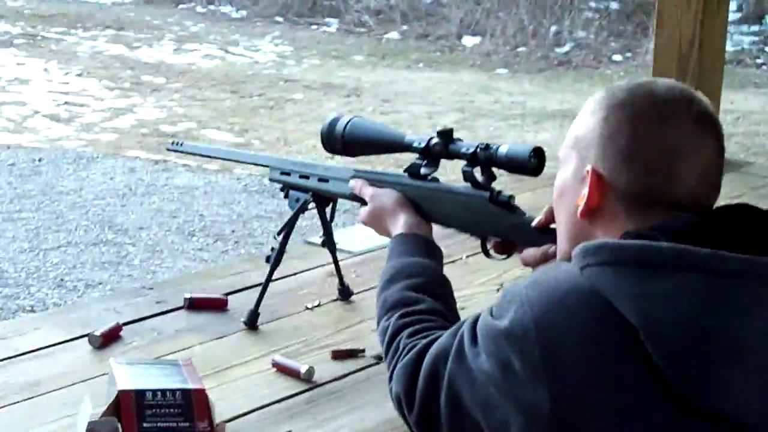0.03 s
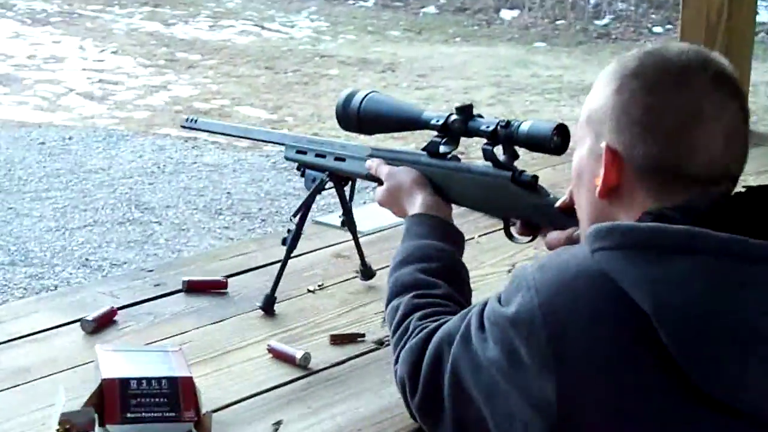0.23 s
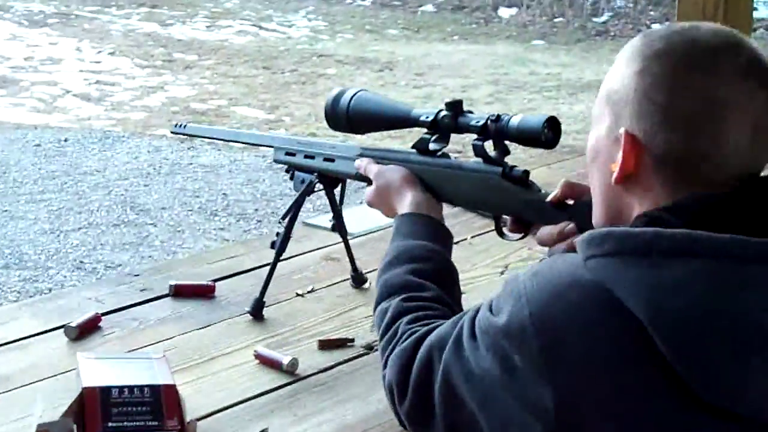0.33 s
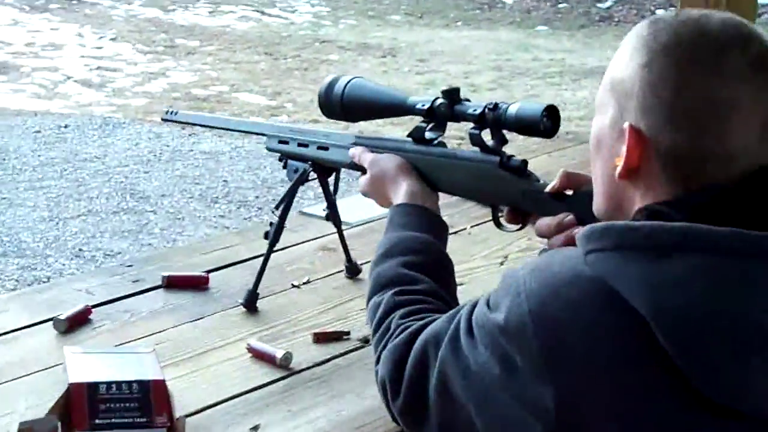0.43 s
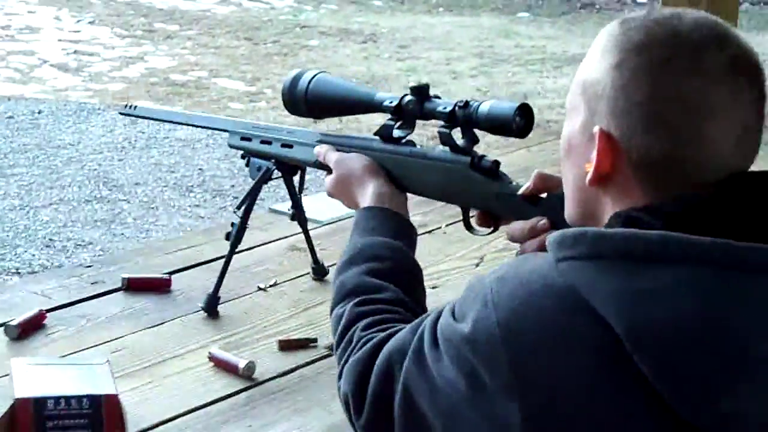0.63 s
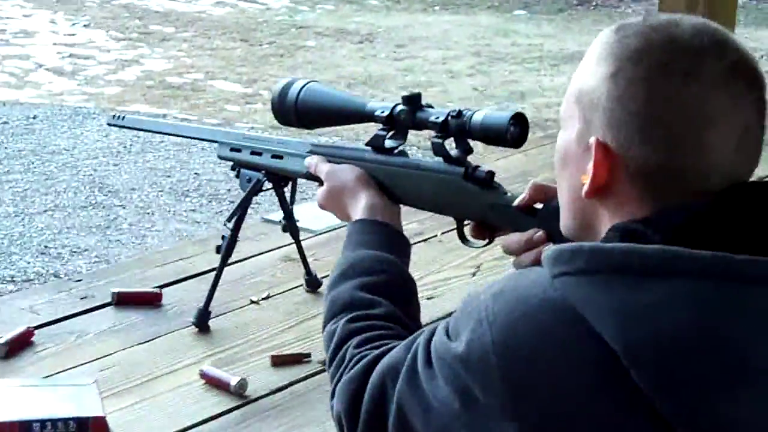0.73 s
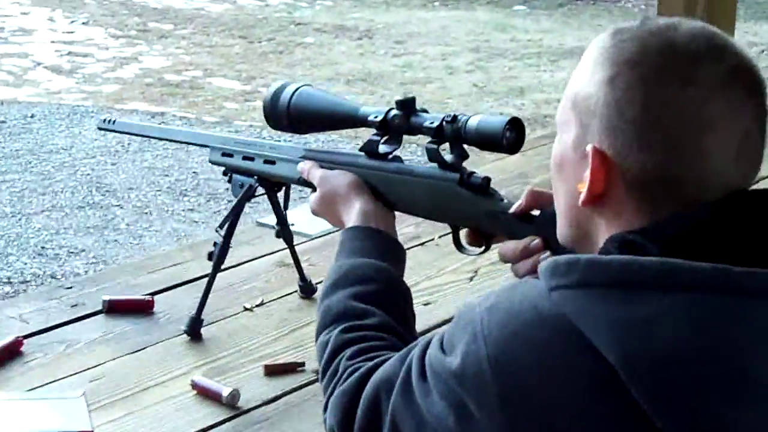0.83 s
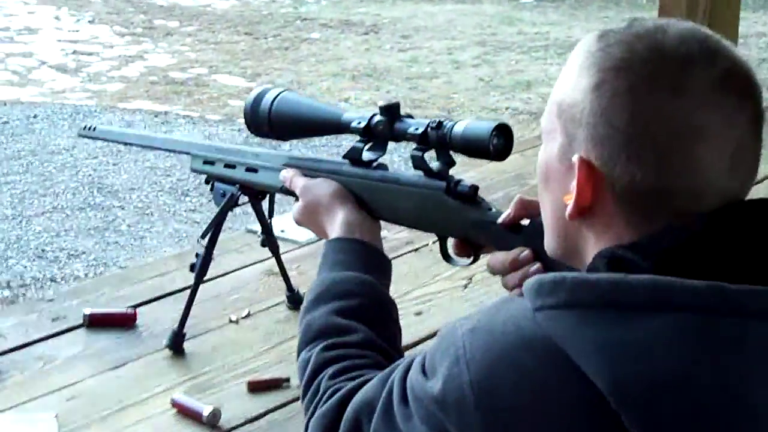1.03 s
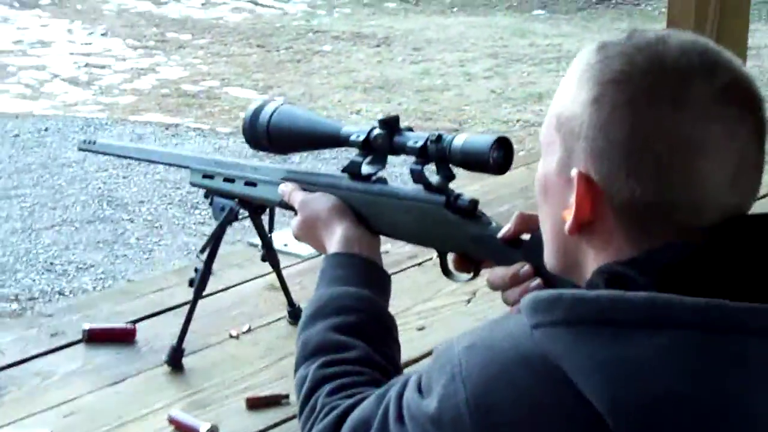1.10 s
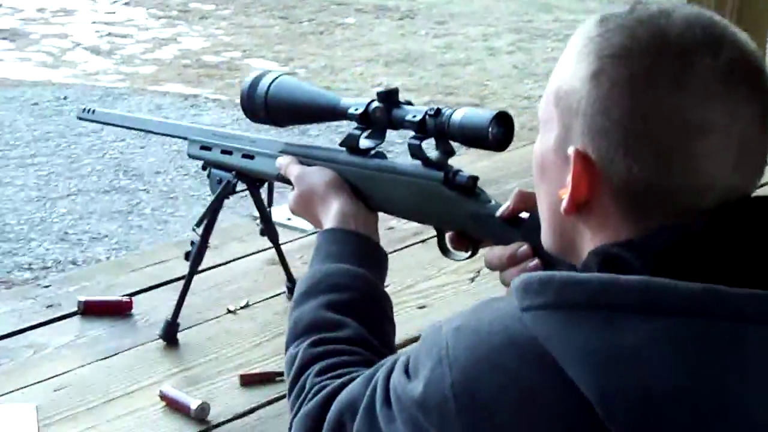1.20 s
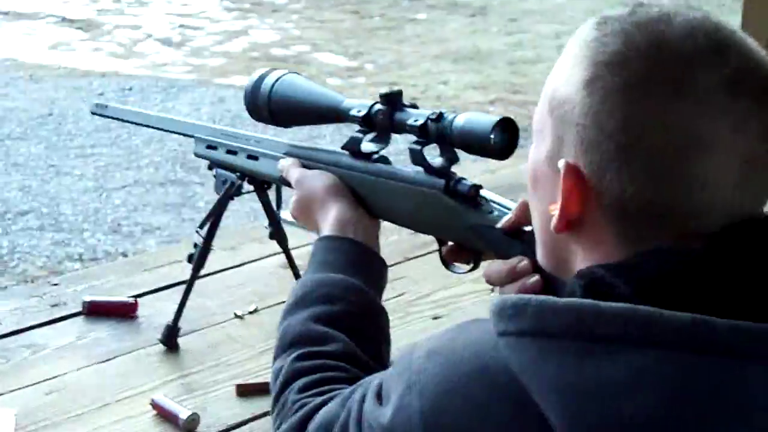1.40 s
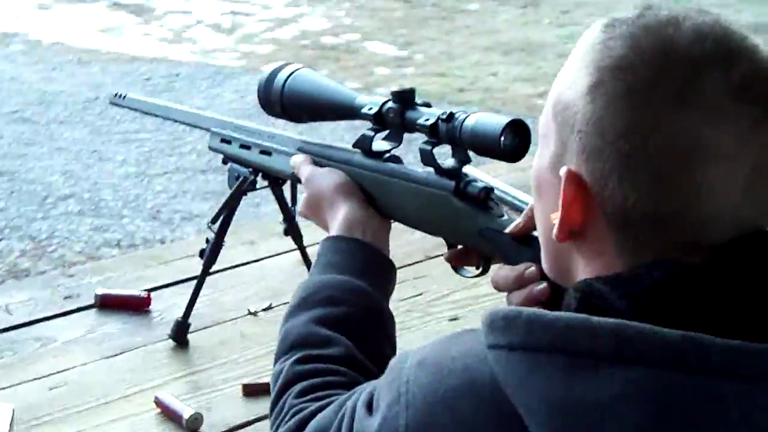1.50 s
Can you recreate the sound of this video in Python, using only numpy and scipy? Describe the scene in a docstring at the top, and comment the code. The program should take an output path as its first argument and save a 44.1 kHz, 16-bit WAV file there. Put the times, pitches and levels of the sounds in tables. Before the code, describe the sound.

One loud rifle shot booms outdoors and rolls away in a long echo.

```python
"""One loud rifle shot booms in a wooden shelter outdoors and rolls away, growing duller.
The blast bounces round the shelter and briefly overloads a nearby microphone. Field and trees
scatter it back, walls add echoes, and a far slope answers after about a second. Under it lies
quiet outdoor air, with a soft shuffle, two small metallic pings and two faint clicks."""
import sys
import numpy as np
from scipy import signal
from scipy.fft import rfft, irfft
from scipy.io import wavfile

SR = 44100
rng = np.random.default_rng(int(sys.argv[2]) if len(sys.argv) > 2 else 0)


def to_wav(s):
    """Save 16-bit WAV."""
    ch = np.atleast_2d(s).T  # columns
    pcm = np.round(np.clip(ch, -1, 1) * 32767)  # PCM
    wavfile.write(sys.argv[1], SR, pcm.astype(np.int16))


N = 68355

SHOT_S = 0.17685
ROLL_FLICKER_DB, ROLL_FLICKER_S = 0.37, 0.0035


def amp(db):
    """Turns decibels into a number to multiply by."""
    return 10 ** (np.asarray(db) / 20)


def unit_level(x):
    """Scales a sound to an average (rms) level of 1."""
    return x / np.sqrt(np.mean(x ** 2) + 1e-20)


def look_up(points, hz):
    """Reads between a table's rows, with octaves evenly spaced."""
    f, value = np.transpose(points)
    return np.interp(np.log(hz + 1), np.log(f + 1), value)


def since(start):
    """Seconds since start, zero before it."""
    return np.maximum(np.arange(N) / SR - start, 0)


def envelope(start, rise, hold, fall_db_per_s):
    """Loudness over time: rises, then fades from `hold` seconds after the start."""
    t = since(start)
    return np.minimum(t / rise, 1) * amp(-fall_db_per_s * np.maximum(t - hold, 0))


def colour(x, points):
    """Turns each frequency up or down by a table, without smearing sound back in time."""
    log_gain = np.log(amp(look_up(points, abs(np.fft.fftfreq(4096, 1 / SR)))))
    taps = np.fft.ifft(np.exp(np.conj(signal.hilbert(log_gain)))).real
    return signal.fftconvolve(x, taps[:len(taps) * 3 // 4])[:N]


def noise(tone):
    """Noise with the given tone, like countless overlapping reflections."""
    return unit_level(colour(rng.standard_normal(N), tone))


def flicker(db, seconds):
    """A random wobble in level, as when reflections arrive in clumps."""
    knots = rng.standard_normal(N)
    return amp(db * np.interp(np.arange(N) / SR / seconds, np.arange(N), knots))


def air():
    """The steady hush of outdoor air."""
    # tone of the hush: (frequency [Hz], relative level [dB])
    tone = [(30, -17), (120, -3), (400, 8.5), (650, 4.5), (1300, -3.5), (3000, -16), (7000, -15),
            (10000, -16)]
    return amp(-56.5) * noise(tone)


def shuffle():
    """A soft, low shuffle before the shot."""
    # tone of the shuffle: (frequency [Hz], relative level [dB])
    tone = [(25, -4), (90, -3), (180, 8), (400, -4), (900, -22), (3000, -36), (9000, -47)]
    return amp(-55) * noise(tone) * envelope(0.051, rise=.004, hold=0.05, fall_db_per_s=1200)


def pings():
    """Metal rings briefly: a faint ping before the shot, a chink after it."""
    # metallic rings: (time [s], pitch [Hz], level [dB], rise [s], fade [dB/s])
    rings = [(.133, 1500, -47, .005, 600), (.38, 8050, -15.5, .0006, 7000)]
    out = np.zeros(N)
    for start, hz, db, rise, fall in rings:
        note = np.sqrt(2) * np.sin(2 * np.pi * hz * since(start))
        out += amp(db) * envelope(start, rise, rise, fall) * note
    return out * flicker(db=5.5, seconds=0.0011)


def blast():
    """A short crack, then the muzzle blast bouncing between floor and roof."""
    # tone of the blast: (frequency [Hz], relative level [dB])
    tone = [(30, -30), (80, -46.5), (160, -11), (400, -4), (700, 0.5), (1100, -2), (1500, -1), (2500, -7.5),
            (3500, -14.5), (7000, -9.5), (10000, -14.5)]
    rise_s = .008
    crack = amp(-21) * envelope(SHOT_S, rise=0.0018, hold=.002, fall_db_per_s=701)
    body = amp(-7) * envelope(SHOT_S, rise_s, hold=0.058, fall_db_per_s=111)
    body *= np.minimum(since(SHOT_S) / rise_s, 1)  # a second ramp curves the rise
    return noise(tone) * (crack + body) * flicker(db=1.0, seconds=0.0016)


def boom():
    """The shelter rings as sound builds under its roof; a faint, very deep rumble lies under the boom."""
    # four bands of the shelter's ringing, then the deep rumble:
    # (pitch [Hz], width [Hz], level [dB], rise [s], fade begins after [s], fade [dB/s])
    bands = [(719, 153, -13, 0.043, 0.13, 163), (482, 186, -20.5, 0.079, 0.17, 138),
             (265, 47, -25, 0.16, 0.11, 140), (173, 50, -38.5, 0.044, 0.21, 88),
             (29.8, 23, -47, .05, 0.033, 259)]
    f, out = np.fft.rfftfreq(N, 1 / SR), np.zeros(N)
    for hz, width, db, rise, hold, fall in bands:
        peak = 1 / (1 + ((f - hz) / width) ** 2) ** 2
        band = irfft(rfft(rng.standard_normal(N)) * peak, N)
        out += amp(db) * unit_level(band) * envelope(SHOT_S, rise, hold, fall)
    return out


def roll():
    """Ever farther ground and trees scatter the shot back; the air takes the treble first."""
    # starting tone of the roll: (frequency [Hz], relative level [dB])
    tone = [(30, -47), (70, -48.5), (110, -21.5), (200, -9), (330, -3.5), (500, 3), (700, 1), (1000, -1),
            (1600, -1.5), (2400, -5), (3500, -14), (7000, -7), (10000, -26)]
    # how fast each frequency dies away: (frequency [Hz], fade [dB/s])
    fades = [(50, 9.8), (150, 17.6), (500, 11.6), (1000, 13.5), (2000, 21.24), (3300, 25.8), (5000, 37),
             (7500, 46.7)]
    hz, t, spectrum = signal.stft(noise(tone), SR, nperseg=512, noverlap=384)
    spectrum *= amp(-look_up(fades, hz)[:, None] * np.maximum(t - SHOT_S, 0))
    tail = signal.istft(spectrum, SR, nperseg=512, noverlap=384)[1][:N]
    fade_in = np.minimum(since(SHOT_S) / 0.13, 1)
    return amp(-15.5) * tail * fade_in * flicker(ROLL_FLICKER_DB, ROLL_FLICKER_S)


def echoes():
    """Nearby walls and the tree line throw the shot back as dull slaps."""
    # separate echoes: (time [s], level [dB], length before fading [s])
    arrivals = [(0.256, -11.5, 0.043), (0.461, -22, 0.037), (0.545, -22.5, 0.044), (0.668, -26, 0.08),
                (0.776, -30.5, .14), (0.972, -30, 0.022), (1.043, -38, .11), (1.25, -42, 0.0079),
                (1.419, -36.5, 0.013)]
    # tone of the echoes: (frequency [Hz], relative level [dB])
    tone = [(40, -53.5), (130, -18), (300, -4.5), (600, 3.5), (1100, -1.5), (2200, -8), (4000, -27.5),
            (8000, -36)]
    slaps = sum(amp(db) * envelope(start, rise=.006, hold=length, fall_db_per_s=730)
                for start, db, length in arrivals)
    return noise(tone) * slaps


def clicks():
    """Two faint clicks late in the roll."""
    # clicks: (time [s], level before filtering [dB], treble limit [Hz])
    ticks = [(1.093, -38, 5000), (1.386, -36, 15000)]
    decay_s, out = 0.00061, np.zeros(N)
    for start, db, top_hz in ticks:
        t = since(start)
        pulse = amp(db) * (t > 0) * np.exp(-t / decay_s)
        out += signal.sosfilt(signal.butter(6, top_hz, fs=SR, output="sos"), pulse)
    return out


def far_slope():
    """A distant slope sends the shot back as a slow, muffled swell."""
    # tone of the swell: (frequency [Hz], relative level [dB])
    tone = [(30, -44), (120, -29.5), (250, -11), (380, -3), (530, 2.5), (800, -6.5), (1100, -5),
            (2200, -19), (3500, -35.5), (7000, -48), (10000, -50)]
    swell = amp(-27.5) * envelope(1.363, rise=0.15, hold=0.15, fall_db_per_s=20)
    return noise(tone) * swell * flicker(ROLL_FLICKER_DB, ROLL_FLICKER_S)


def scene():
    """The shot and its echoes over quiet outdoor air, in one channel."""
    return (air() + shuffle() + pings() + blast() + boom() + roll() + echoes() + far_slope())[None]


def record(dry):
    """The microphone colours the sound and its amplifier squashes the peaks; the clicks join here."""
    # microphone tone, with a narrow dip near 4200 Hz: (frequency [Hz], gain [dB])
    microphone = [(20, 0), (2900, 0), (3500, -2), (3950, -9), (4190, -21), (4450, -10), (4850, -4),
                  (6000, -1), (7300, 0), (10000, -3)]
    # the recorder's loss of treble: (frequency [Hz], gain [dB])
    treble_loss = [(20, -0.5), (7550, -0.5), (8000, -5.5), (8450, -10.5), (8800, -20.5), (9150, -43),
                   (9700, -65)]
    overload_level, hardness, clip_level, top_hz = .95, 3, .72, 15800
    heard = colour(dry[0], microphone)
    squashed = heard / (1 + abs(heard / overload_level) ** hardness) ** (1 / hardness)
    clipped = np.clip(colour(squashed, treble_loss) + clicks(), -clip_level, clip_level)
    low_pass = signal.firwin(1023, top_hz, window=("kaiser", 9), fs=SR)
    return signal.fftconvolve(clipped, low_pass, "same")[None]


dry = scene()
out = record(dry)
to_wav(out)
```